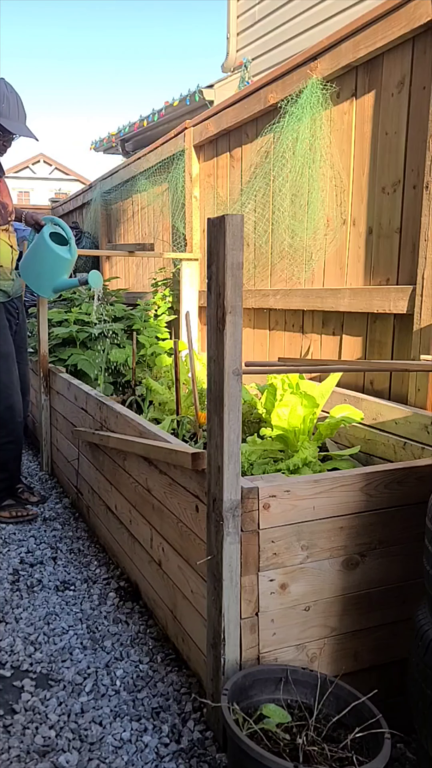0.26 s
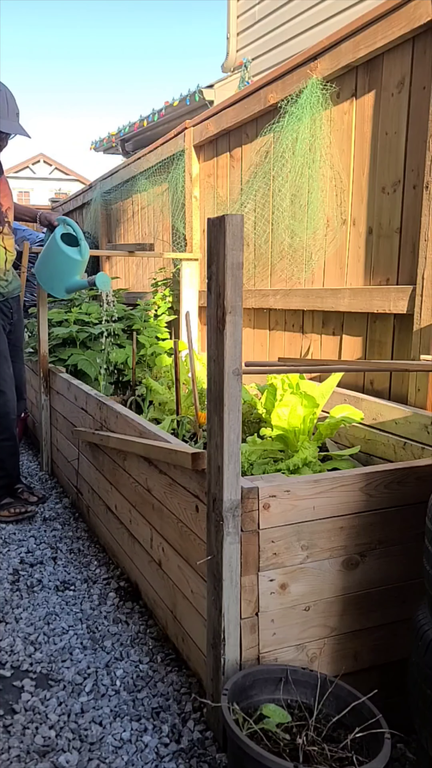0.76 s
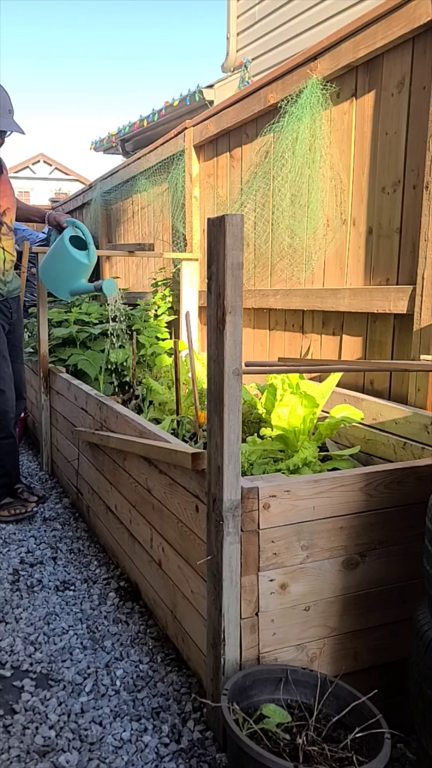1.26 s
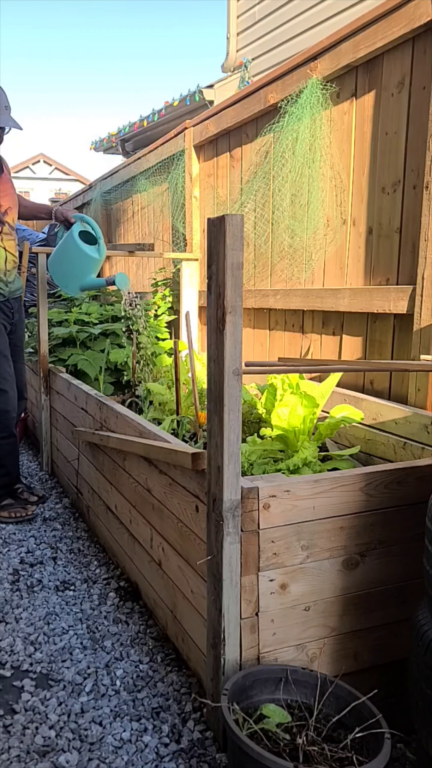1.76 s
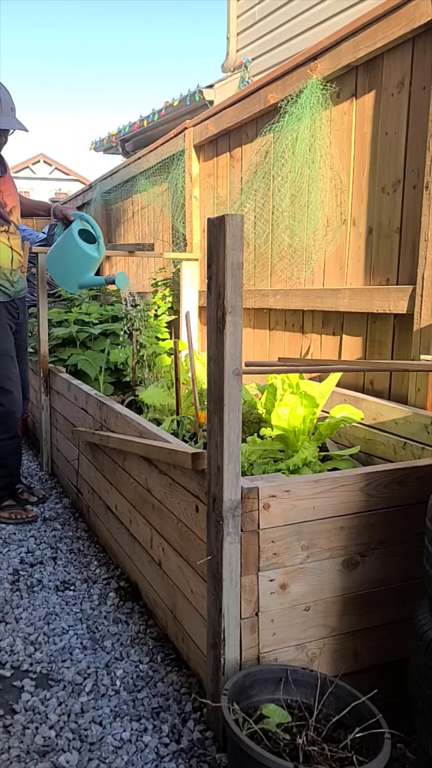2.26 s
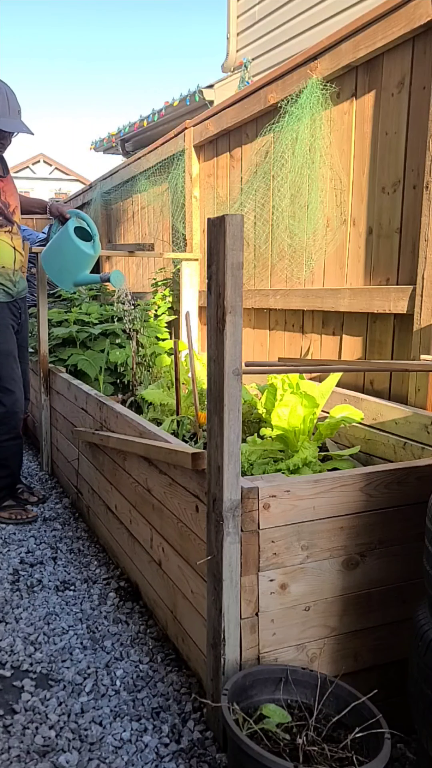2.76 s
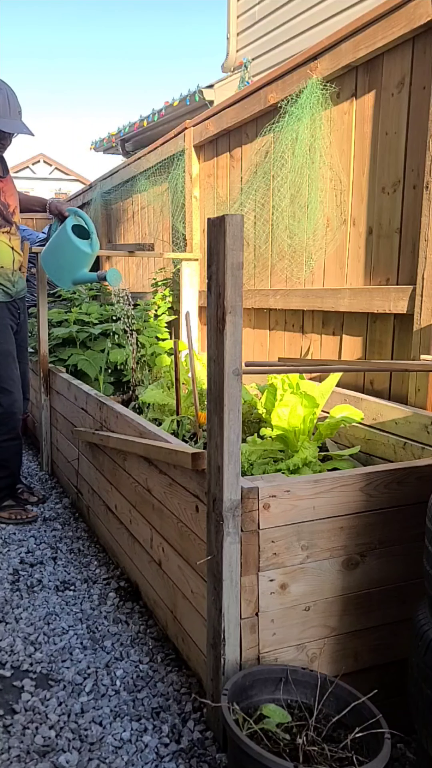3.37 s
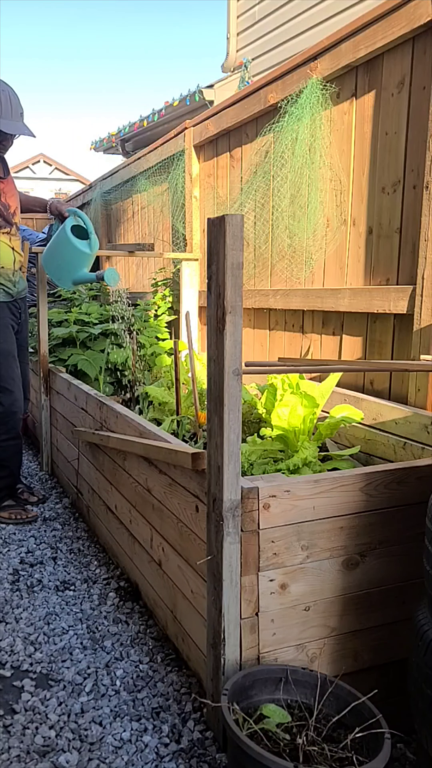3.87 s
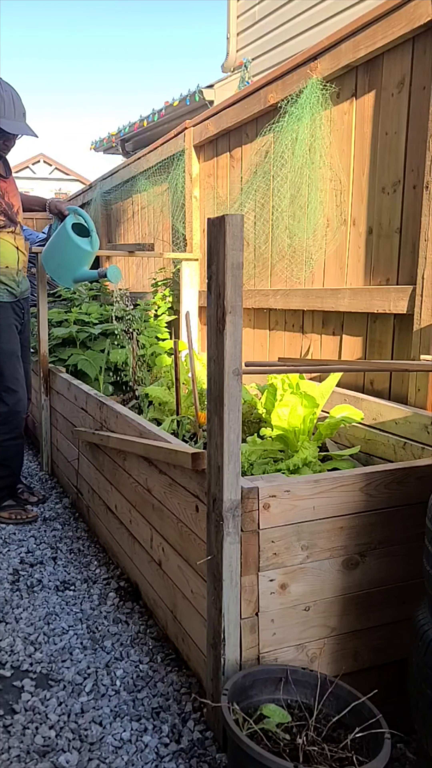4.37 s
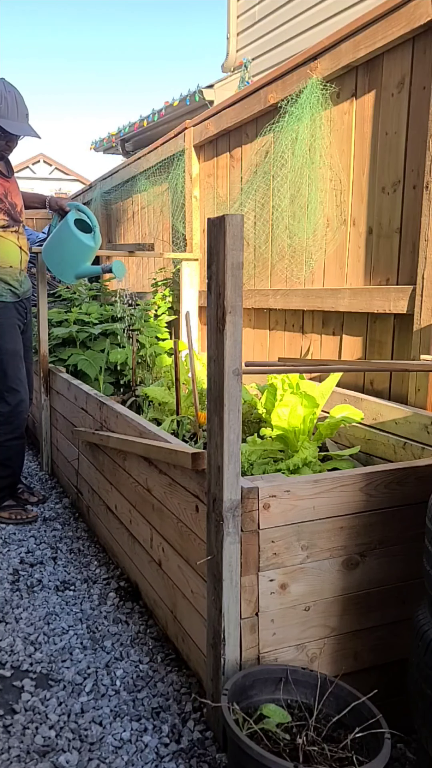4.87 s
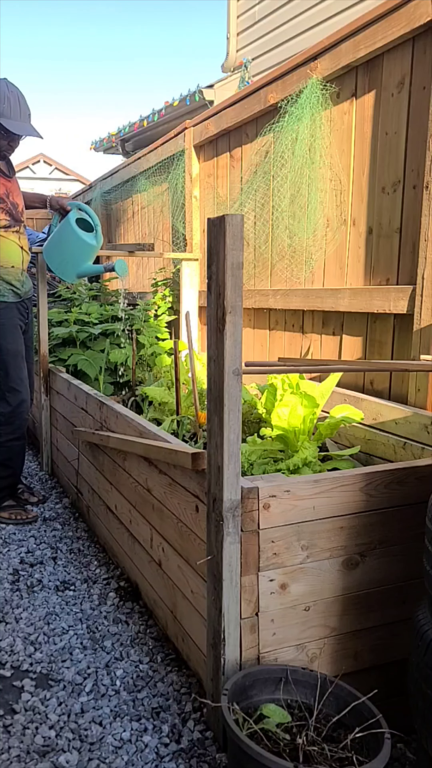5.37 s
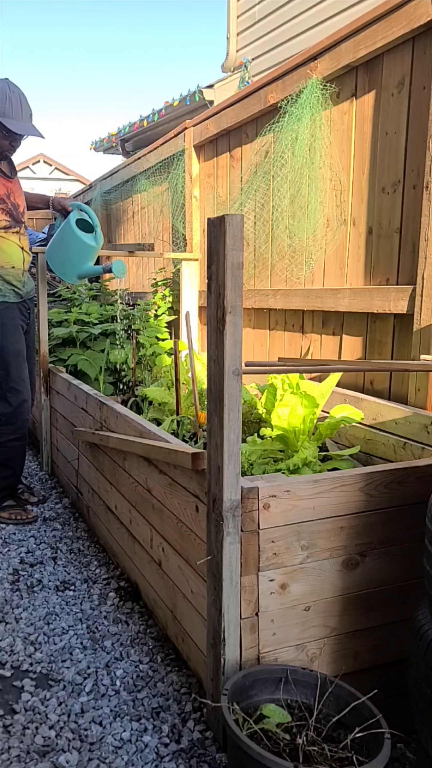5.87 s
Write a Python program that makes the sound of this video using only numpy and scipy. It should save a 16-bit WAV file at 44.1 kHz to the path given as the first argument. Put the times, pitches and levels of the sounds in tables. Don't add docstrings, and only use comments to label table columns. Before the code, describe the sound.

Continuous water patter on leaves, close and crisp in wide stereo, swelling and easing as the stream moves. Separate clumps tick, ring and splatter, denser and harder toward the end. Behind it lie low traffic rumble, soft tyre hiss, a faint motor hum at the start and one very thin high bird note late on. Small outdoor yard with short tails.

```python
import sys
import numpy as np
from scipy import signal
from scipy.fft import rfft, irfft, next_fast_len
from scipy.io import wavfile
from scipy.ndimage import uniform_filter1d

SR = 44100
rng = np.random.default_rng(int(sys.argv[2]) if len(sys.argv) > 2 else 0)


def field_ratio(decibels):
    return 10 ** (np.asarray(decibels, dtype=float) / 20)


def int16_out(signal):
    q = np.round(np.clip(np.atleast_2d(signal).T, -1, 1) * 32767)
    wavfile.write(sys.argv[1], SR, q.astype(np.int16))


N = 269892
LONG = next_fast_len(N)

# (time [s], level [dB])
ENGINE_SWELLS = [
    (0, -40.5),
    (1.2, -41),
    (2.0, -40.5),
    (2.8, -39.5),
    (3.25, -37.5),
    (3.8, -40.5),
    (4.2, -38.5),
    (4.7, -42),
    (6.12, -41.5),
]
# (frequency [Hz], density [dB per Hz])
RUMBLE_SPECTRUM = [(8.8, -60), (15, -13), (54, 6), (70, 1.5), (103, -14), (130, -12.5), (170, -18.5),
                   (290, -120)]
# (frequency [Hz], density [dB per Hz])
TOWN_SPECTRUM = [(53, -18), (90, -1.5), (107, -8), (147, -5.5), (211, -9.5), (312, -11.5), (355, -18.5),
                 (488, -26.5), (541, -26.5), (642, -37), (700, -36.5), (910, -55), (1540, -120)]
# (frequency [Hz], density [dB per Hz])
TYRE_SPECTRUM = [(290, -45), (500, -17), (641, -8.5), (1010, 4.5), (1450, -3), (1690, -3), (2350, -13.5),
                 (2940, -15.5), (3200, -20), (4160, -62), (7040, -120)]
# (time [s], pitch [Hz], level [dB])
MOTOR_DRONE = [
    (0.0, 310.3, -46.5),
    (0.39, 313.3, -61),
    (2.58, 324.1, -66.5),
    (3.0, 301, -73),
]
# (time [s], pitch [Hz], level [dB])
BIRD_NOTE = [
    (4.63, 8184, -79),
    (4.724, 8121, -70),
    (4.8, 8154, -74),
]
# (time [s], patter level [dB])
STREAM_FORCE = [(0.0, -63.5), (0.32, -63), (0.49, -62.5), (0.92, -62.5), (1.41, -58.5), (2.06, -63.5),
                (2.81, -60.5), (3.51, -62), (4.35, -57.5), (4.84, -61.5), (5.3, -57), (5.81, -63),
                (6.0, -57.5), (6.12, -60.5)]
# (frequency [Hz], density [dB per Hz])
DROP_SPECTRUM = [(1060, -14), (1800, -2.5), (2410, -8), (4290, 1), (5390, -5), (5860, -7.5), (7270, -4),
                 (8200, -18), (10700, -52), (18000, -120)]
# (frequency [Hz], density [dB per Hz])
SPRAY_SPECTRUM = [(4120, -6.5), (7000, 0), (7380, -0.5), (7970, -3.5), (8490, -5.5), (10600, -3),
                  (11500, 0), (14600, -2), (15500, -2.5)]
# (time [s], peak [dB], leaf ring [Hz])
LEAF_SLAPS = [(0.0636, -44, 4070), (0.309, -45, 4340), (0.467, -36, 3350), (0.582, -44.5, 4020),
              (0.985, -44.5, 2900), (1.0655, -43.5, 4340), (1.314, -44, 4200), (1.4236, -42.5, 3420),
              (1.736, -37, 3120), (1.7633, -36.5, 4050), (2.526, -46, 2980), (3.1197, -37, 3420),
              (3.2722, -46.5, 2620), (3.5553, -40.5, 4100), (4.1393, -42, 4080), (4.4234, -42.5, 3700),
              (4.48, -45, 3450), (4.592, -43, 3270), (4.703, -42.5, 2950), (4.982, -46.5, 4120),
              (5.176, -41.5, 3640), (5.2366, -40, 4100), (5.5352, -39, 3200), (5.6247, -43, 3910),
              (5.775, -40.5, 3620), (5.83, -39.5, 3950), (5.9085, -34, 3320), (5.918, -34.5, 4200),
              (6.024, -36.5, 3620), (6.071, -40.5, 3080),
              (0.182, -50, 4340), (0.7206, -49, 3730), (0.899, -49, 3830), (1.2042, -48, 4310),
             (1.267, -54, 4270), (1.288, -47.5, 4300), (1.6832, -47.5, 3580), (1.8696, -54, 4000),
             (2.0794, -50, 2650), (2.9796, -49, 4700), (3.226, -49, 4400), (3.484, -49.5, 3200),
             (3.5252, -48, 3560), (3.8686, -53.5, 3600), (4.378, -53, 4300), (4.455, -48, 2440),
             (4.8112, -50, 3900), (5.5016, -45.5, 4020), (5.688, -52, 3180), (5.8442, -47, 4080)]
# (time [s], peak [dB], leaf ring [Hz], t60 [s])
THIN_LEAF_TAPS = [(0.014, -41.5, 5630, 0.24), (0.3006, -45.5, 5500, 0.13), (0.4668, -39, 5160, 0.17),
                  (0.646, -41.5, 5200, 0.1), (0.8135, -48, 6200, 0.13), (0.979, -42.5, 5840, 0.6),
                  (1.197, -45, 7140, 0.13), (1.4243, -35.5, 6400, 0.18), (1.672, -46, 5750, 0.21),
                  (1.936, -48, 7060, 0.094), (2.2832, -53, 6170, 0.185), (2.5256, -42, 6800, 0.3),
                  (2.645, -44.5, 6140, 0.22), (2.7452, -44, 6450, 0.097), (2.8296, -36.5, 6900, 0.13),
                  (3.502, -43, 5350, 0.22), (3.707, -45.5, 6800, 0.11), (3.9764, -43, 7240, 0.088),
                  (4.0626, -43.5, 5400, 0.13), (4.304, -44, 5280, 0.18), (4.317, -42.5, 6830, 0.24),
                  (4.801, -42.5, 6100, 0.15), (4.8506, -45.5, 6350, 0.14), (5.162, -44.5, 6440, 0.098),
                  (5.3115, -52, 6440, 0.112), (5.3812, -43.5, 5650, 0.26), (5.5017, -43.5, 6260, 0.077),
                  (5.7733, -38, 6260, 0.25), (5.963, -40, 7200, 0.087), (6.105, -40, 6800, 0.14)]
# (time [s], peak [dB], cavity [Hz], t60 [s])
PUDDLE_PLOPS = [
    (0.0915, -47, 1890, 0.1),
    (0.6459, -40.5, 1930, 0.26),
    (0.7174, -54, 2100, 0.13),
    (1.737, -34, 2060, 0.14),
    (2.635, -55, 2390, 0.14),
    (2.8282, -49, 2120, 0.11),
    (2.9807, -45, 1800, 0.18),
    (3.274, -47, 1830, 0.081),
    (5.626, -47.5, 2070, 0.12),
]
# (time [s], peak [dB], brightest [Hz], t60 [s])
SPRAY_BURSTS = [(0.184, -51.5, 11500, 0.15), (0.3752, -48.5, 13400, 0.35), (0.5808, -46.5, 14600, 0.41),
                (1.067, -52, 14600, 0.12), (1.2455, -49, 10200, 0.44), (1.425, -49.5, 11400, 0.094),
                (1.4556, -53, 13000, 0.12), (1.481, -49, 11100, 0.163), (1.8108, -51, 12300, 0.12),
                (2.285, -52.5, 11600, 0.1), (2.6813, -52.5, 11700, 0.12), (2.7467, -51, 13400, 0.09),
                (2.829, -50, 8160, 0.13), (2.9562, -54.5, 11300, 0.18), (3.274, -51, 14300, 0.095),
                (3.6445, -55, 14800, 0.25), (3.708, -53, 12400, 0.11), (4.0664, -51, 10600, 0.16),
                (4.5241, -56, 14800, 0.12), (4.572, -50, 12000, 0.35), (4.8565, -53, 12600, 0.095),
                (4.9782, -46.5, 13000, 0.23), (5.1359, -50.5, 13500, 0.22), (5.198, -55, 12800, 0.1),
                (5.235, -46, 14200, 0.086), (5.3137, -45, 10600, 0.12), (5.3767, -51, 11700, 0.12),
                (5.4912, -48.5, 12800, 0.11), (5.9369, -50, 11600, 0.24), (6.0654, -50, 12800, 0.22)]
# (frequency [Hz], left-right likeness [0 to 1])
MIC_LIKENESS = [(60, .95), (290, .91), (450, .68), (740, .4), (2000, .3), (3300, .05)]
# (frequency [Hz], left over right [dB])
MIC_LEAN = [(60, 1), (110, 0.5), (200, 1.5), (380, -0.5), (700, 0.5), (1290, 2.5), (2380, 2), (4400, -4),
            (8120, -2.5), (15000, -3.5)]
# (frequency [Hz], lead of the left port [rad])
MIC_LEAD = [(430, 0), (1120, 1.28), (2500, 0.83)]
# (frequency [Hz], width [Hz], level [dB])
MIC_PORTS = [
    (3220, 230, 2.5),
    (4140, 200, 1),
    (5400, 190, 1),
    (7930, 250, -4.5),
]


def amp_of(points, hz):
    f, value = np.transpose(points)
    return np.interp(np.log(hz + 1), np.log(f + 1), value)


def curve(rows, t):
    s, *columns = np.transpose(rows)
    return [np.interp(t, s, c) for c in columns]


def evened(x):
    return x / np.sqrt(np.mean(x ** 2) + 1e-20)


def add(mix, s, sound):
    part = mix[:, round(s * SR):][:, :sound.shape[1]]
    part += sound[:, :part.shape[1]]


def pair_lean_db(hz):
    return amp_of(MIC_LEAN, hz) / 2 * np.array([[1], [-1]])


def coloured(x, spectrum):
    hz = np.fft.rfftfreq(LONG, 1 / SR)
    gain = field_ratio(amp_of(spectrum, hz) + pair_lean_db(hz))
    return evened(irfft(rfft(x, LONG) * gain, LONG)[:, :N])


def diffuse(size, patchy_db, bins, spans):
    frames = 4 * N // size + 5
    hz = np.fft.rfftfreq(size, 1 / SR)
    a, b, c, d, patches = rng.standard_normal((frames, len(hz), 5)).T
    patches = uniform_filter1d(patches, size=bins, axis=0)
    patches = evened(uniform_filter1d(patches, size=spans, axis=1))
    same = np.clip(amp_of(MIC_LIKENESS, hz), -1, 1)[:, None]
    left = a + 1j * b
    shared = same * left * np.exp(-1j * amp_of(MIC_LEAD, hz))[:, None]
    right = shared + np.sqrt(1 - same ** 2) * (c + 1j * d)
    z = np.array([left, right]) * field_ratio(patchy_db * patches)
    return signal.istft(z, nperseg=size, noverlap=3 * size // 4)[1][:, :N]


def traffic():
    rumble_db = curve(ENGINE_SWELLS, np.arange(N) / SR)[0]
    far = diffuse(size=2048, patchy_db=2.5, bins=2, spans=9)
    engines = field_ratio(rumble_db) * coloured(far, RUMBLE_SPECTRUM)
    town = field_ratio(-47.5) * coloured(far, TOWN_SPECTRUM)
    tyres = field_ratio(-54.5) * coloured(far, TYRE_SPECTRUM)
    return engines + town + tyres


def tone(rows, waver, smooth_s):
    t = np.arange(rows[0][0], rows[-1][0], 1 / SR)
    hz, level_db = curve(rows, t)
    drift = evened(uniform_filter1d(rng.standard_normal(len(t)), round(smooth_s * SR)))
    phase = 2 * np.pi * np.cumsum(hz * (1 + waver * drift)) / SR
    wave = field_ratio(level_db) * np.sqrt(2) * np.sin(phase)
    return rows[0][0], wave * signal.windows.tukey(len(t), .1) * np.ones((2, 1))


def motor():
    return tone(MOTOR_DRONE, waver=0.01155, smooth_s=0.048)


def bird():
    return tone(BIRD_NOTE, waver=0.0041, smooth_s=0.0047)


def echoes(t60, rise_s, direct_db):
    t = np.arange(6144) / SR
    draw = rng.random((len(t), 2)).T
    taps = (draw < .25) * (16 * draw - 2)
    clumping_db = 1.45 * evened(uniform_filter1d(rng.standard_normal(len(t)), size=130))
    taps *= (1 - np.exp(-t / rise_s)) * field_ratio(clumping_db - 60 * t / t60)
    taps *= 1 + 0.5 * np.exp(-t / 0.0056)
    taps[:, 8] = field_ratio(direct_db)
    return taps


def ring(f, hz, sharpness, scatter, mode_q):
    offsets = np.arange(-4, 5) + rng.uniform(-0.69, 0.63, 9)
    modes = hz * np.exp(scatter * offsets)[:, None]
    strengths = rng.uniform(0.26, 1, (9, 1))
    lines = (strengths / (1 + 1j * mode_q * (f / modes - modes / f))).sum(0)
    return (.5 + lines) / (1 + .6j * sharpness * (f / hz - hz / f)) ** 2


def patter(spectrum, mist, low_hz, high_hz, per_s, spread_db, t60, broad, mist_db):
    sizes = field_ratio(spread_db * np.minimum(rng.exponential(1, N), 4))
    sizes *= rng.random(N) < per_s / SR
    kind = rng.integers(0, 8, N)
    drops = np.zeros((2, N))
    for k, hz in enumerate(np.geomspace(low_hz, high_hz, 8)):
        tail = echoes(t60, rise_s=0.0012, direct_db=3.0)
        f = np.fft.rfftfreq(tail.shape[1], 1 / SR) + 1
        colour = broad + ring(f, hz, sharpness=3.5, scatter=0.094, mode_q=24)
        grain = evened(irfft(rfft(tail) * colour, tail.shape[1]))
        drops += signal.oaconvolve((sizes * (kind == k))[None], grain, axes=1)[:, :N]
    return evened(coloured(drops, spectrum) + field_ratio(mist_db) * coloured(mist, spectrum))


def stream():
    force_db = curve(STREAM_FORCE, np.arange(N) / SR)[0] + 61
    mist = diffuse(size=512, patchy_db=4.5, bins=7, spans=13)
    coarse = patter(DROP_SPECTRUM, mist, low_hz=2380, high_hz=7660, per_s=220, spread_db=5.5,
                    t60=0.18, broad=0.47, mist_db=-6.5)
    fine = patter(SPRAY_SPECTRUM, mist, low_hz=7640, high_hz=15600, per_s=200, spread_db=2.5,
                  t60=0.11, broad=0.71, mist_db=-1.5)
    return field_ratio(force_db - 62.5) * coarse + field_ratio(0.88 * force_db - 59.5) * fine


def splash(row, spectrum, sharpness, mode_q, broad_db, gain_db, rise_s, direct_db):
    s, peak_db, hz, t60 = row
    tail = echoes(np.clip(t60, .03, .5), rise_s, direct_db)
    f = np.fft.rfftfreq(tail.shape[1], 1 / SR) + 1
    splatter = field_ratio(broad_db + amp_of(spectrum, f))
    colour = ring(f, hz, sharpness, 0.0913, mode_q) + splatter
    sound = irfft(rfft(tail) * colour, tail.shape[1])
    sound /= np.sqrt(np.mean(sound[:, :400] ** 2, axis=1, keepdims=True))
    return s, sound * field_ratio(peak_db + gain_db + pair_lean_db(hz))


def clumps():
    out = np.zeros((2, N))
    for row in LEAF_SLAPS:
        add(out, *splash((*row, 0.21), DROP_SPECTRUM, sharpness=3, mode_q=140, broad_db=-14,
                         gain_db=-8, rise_s=0.00056, direct_db=11.5))
    for row in THIN_LEAF_TAPS:
        add(out, *splash(row, DROP_SPECTRUM, sharpness=2.84, mode_q=87, broad_db=-5.5,
                         gain_db=-10.5, rise_s=0.0014, direct_db=8))
    for row in PUDDLE_PLOPS:
        add(out, *splash(row, DROP_SPECTRUM, sharpness=5.1, mode_q=13, broad_db=-21.5,
                         gain_db=-6, rise_s=0.0007, direct_db=15.0))
    for row in SPRAY_BURSTS:
        add(out, *splash(row, SPRAY_SPECTRUM, sharpness=5.2, mode_q=27, broad_db=7.5,
                         gain_db=-2, rise_s=0.00081, direct_db=-4))
    return out


def scene():
    mix = traffic()
    add(mix, *motor())
    add(mix, *bird())
    return mix + stream() + clumps()


def band_limit(x):
    return signal.sosfilt(signal.butter(12, 15750, fs=SR, output="sos"), x)


def record(dry):
    f = np.fft.rfftfreq(LONG, 1 / SR)
    ports = sum((field_ratio(db) - 1) / (1 + 2j * (f - hz) / width) for hz, width, db in MIC_PORTS)
    below_limit = f < 15750
    picked = irfft(rfft(dry, LONG) * (1 + ports) * below_limit, LONG)[:, :N]
    return band_limit(picked)


dry = scene()
out = record(dry)
int16_out(out)
```